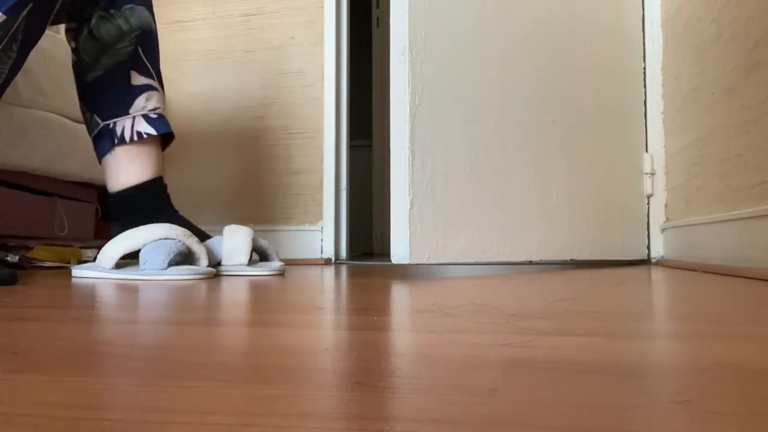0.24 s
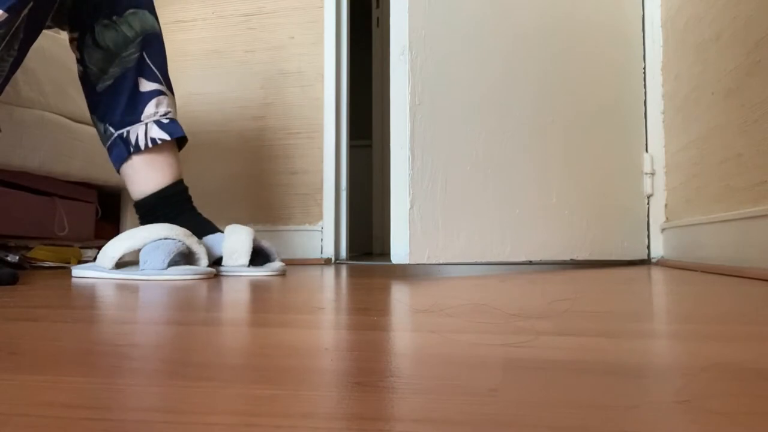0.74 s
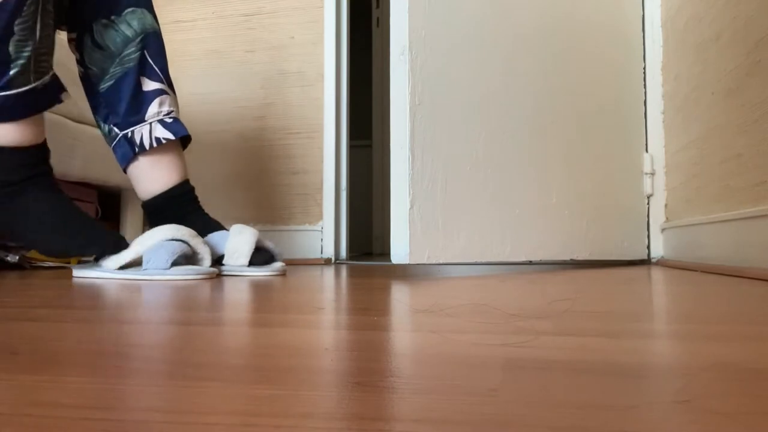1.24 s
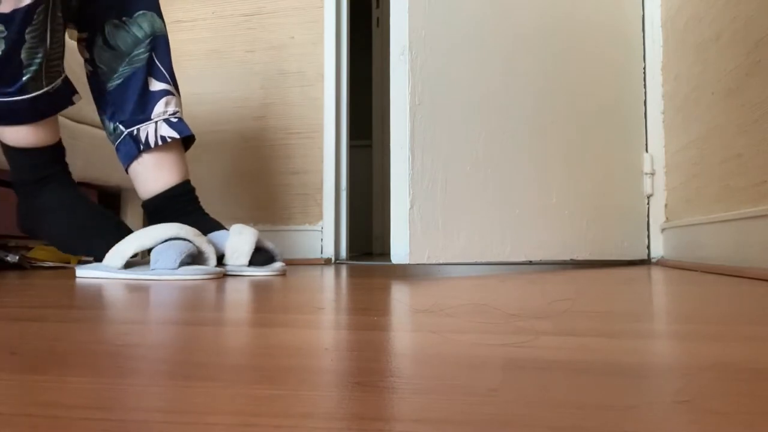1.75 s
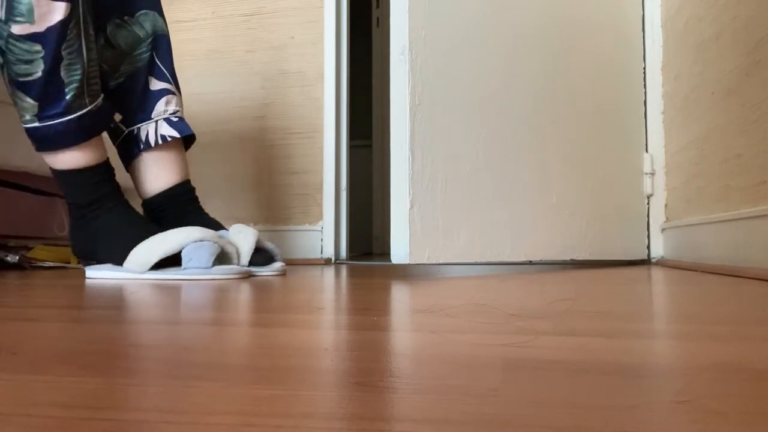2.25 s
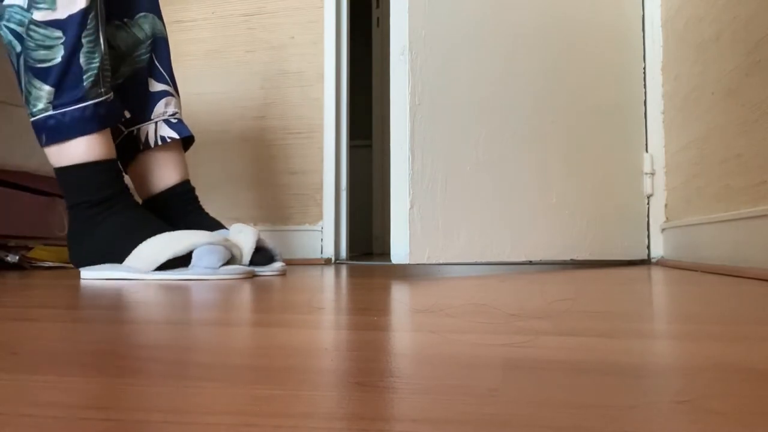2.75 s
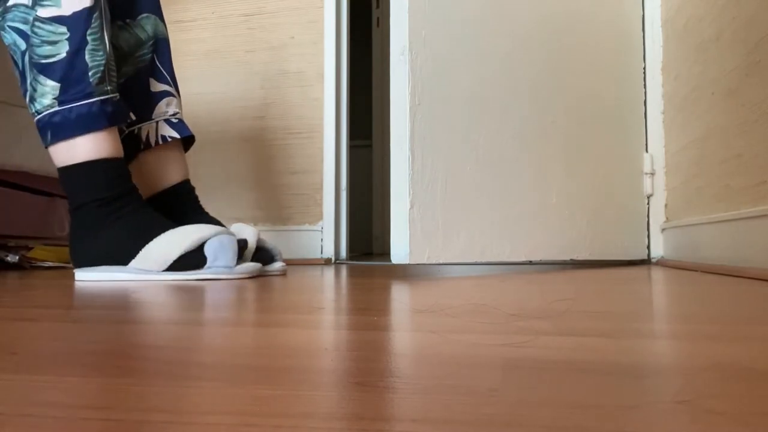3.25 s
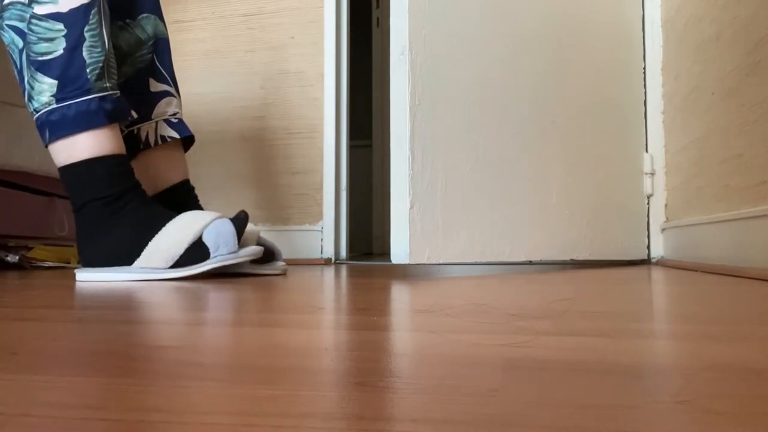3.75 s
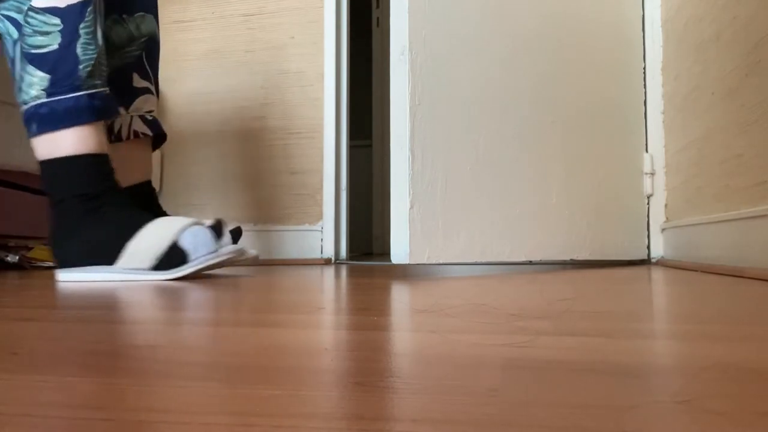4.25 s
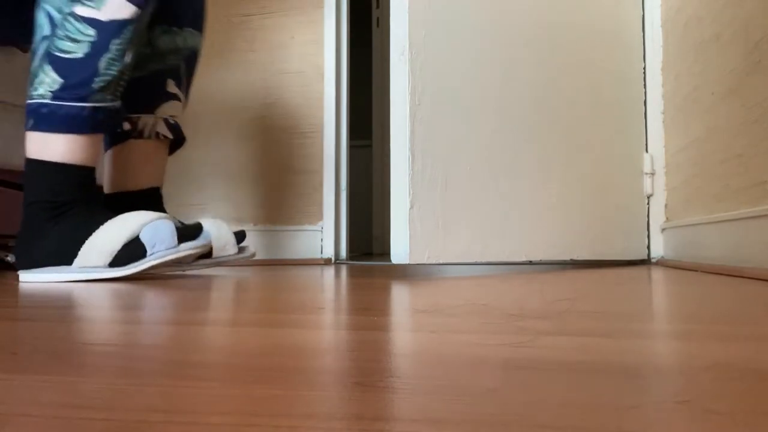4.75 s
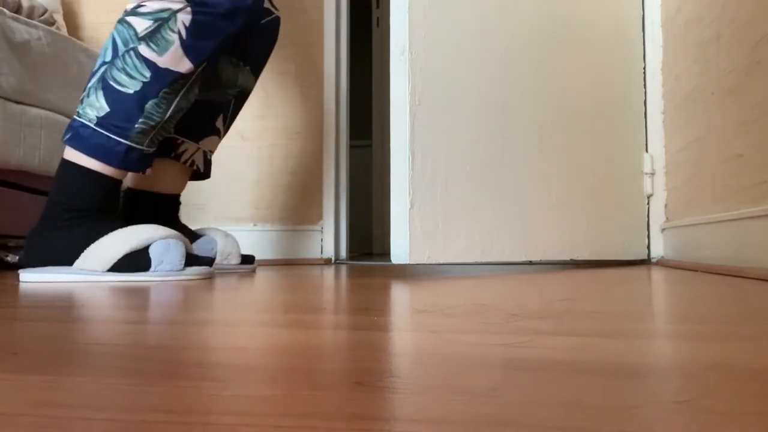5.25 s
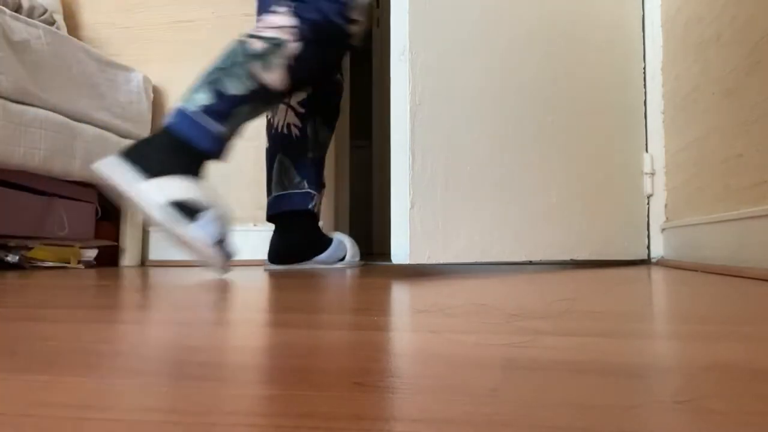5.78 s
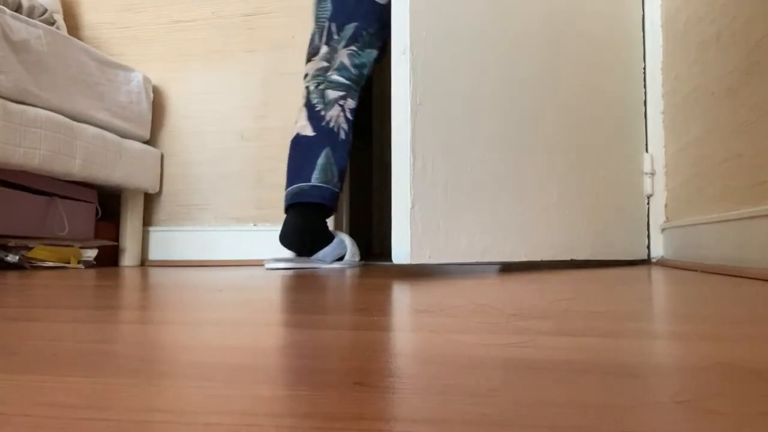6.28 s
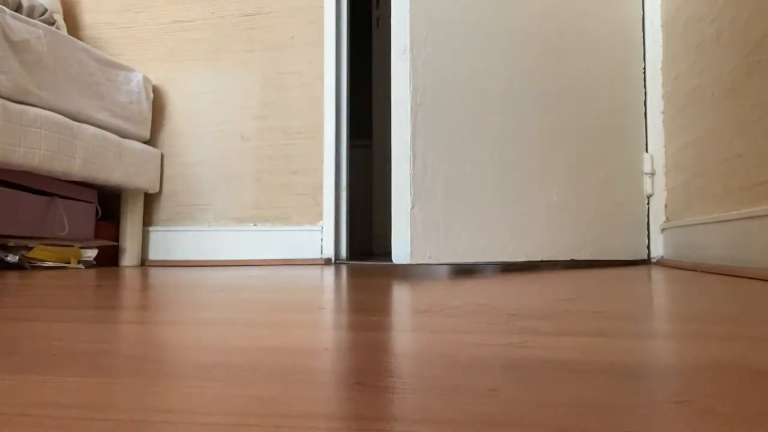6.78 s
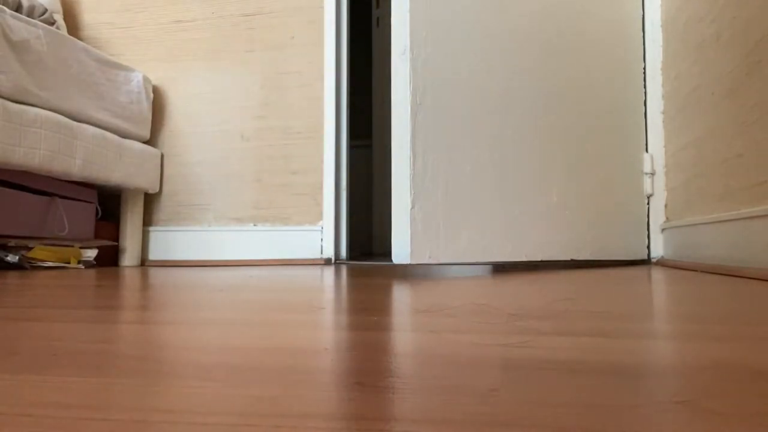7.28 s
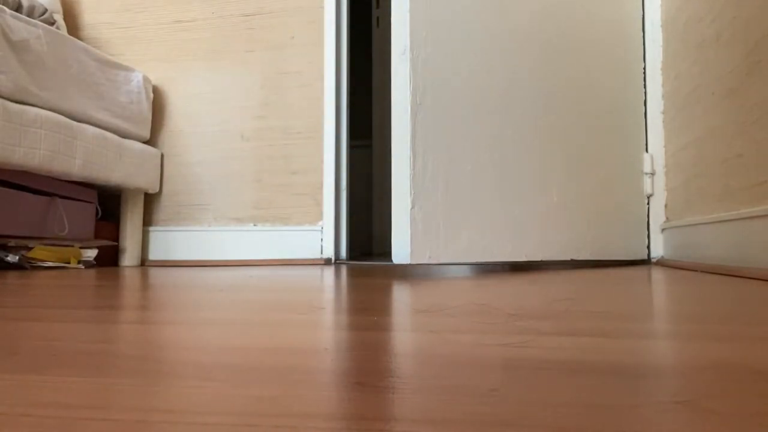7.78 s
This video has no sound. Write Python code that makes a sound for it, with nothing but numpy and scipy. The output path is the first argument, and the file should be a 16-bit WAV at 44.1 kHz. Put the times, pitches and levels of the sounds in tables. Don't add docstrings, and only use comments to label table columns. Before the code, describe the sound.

Stereo floor-level microphones catch fabric brushing and muffled bumps as feet settle into slippers, over still room air and faint low traffic, with one motor briefly humming past early on. Sticky little ticks and a shuffle come midway, then quick scraping steps over wood, a crisp double slap of the sole at the threshold, and a few softer, more echoing scuffs and taps beyond the door.

```python
import sys
import numpy as np
from scipy import signal
from scipy.fft import rfft, irfft, next_fast_len
from scipy.io import wavfile
from scipy.ndimage import uniform_filter1d

SR = 44100
rng = np.random.default_rng(int(sys.argv[2]) if len(sys.argv) > 2 else 0)


def unload_audio(sound):
    columns = np.transpose(np.atleast_2d(sound))
    steps = np.round(np.clip(columns, -1, 1) * 32767)
    wavfile.write(sys.argv[1], SR, steps.astype(np.int16))


def makeup_ratio(level_db):
    decades = np.asarray(level_db, float) / 20
    return 10 ** decades


N = 353814

# frequency in Hz, level in dB per Hz.
AIR_TONE = [(56, -25.5), (95, 0.5), (123, -7), (180, -25), (238, -22.5), (282, -22), (307, -28),
            (633, -65.5), (872, -55), (1010, -42.5), (2280, -52), (9910, -60), (15500, -66)]
# time in seconds, level in dB.
ENGINE_LEVEL = [(0.0, -54.5), (.3, -63), (.65, -73), (.96, -58), (1.3, -61), (1.9, -81.5), (2.03, -50),
                (2.41, -53.5), (2.59, -47.5), (3.04, -51), (3.15, -55.5), (3.48, -46), (3.8, -51.5),
                (4.24, -65.5), (5.02, -57), (5.78, -61.5), (6.1, -53), (8.02, -69.5)]
# time in seconds, level in dB.
TRAFFIC_LEVEL = [(0.0, -56), (.55, -54), (.73, -67.5), (.96, -50), (1.4, -57.5), (1.8, -50.5), (2.1, -61),
                 (2.6, -54), (3.2, -61), (3.8, -55), (4.24, -61.5), (4.5, -53.5), (5.2, -52), (5.8, -58.5),
                 (6.1, -56), (6.79, -49.5), (7.5, -56.5), (8.02, -48)]
# frequency in Hz, width in Hz, level in dB.
ROOM_MODES = [
    [(65.65, 10.6, 2), (77.9, 5.4, -0.5)],
    [(152.06, 5.7, 4), (172.2, 29, 1.5)],
]
# time in seconds, pitch in Hz, level in dB.
MOTOR_BOOM = [
    (0.8, 67.8, -58),
    (0.872, 69, -44.5),
    (0.972, 71.4, -39),
    (1.094, 69.9, -37),
    (1.216, 74.3, -42.5),
    (1.42, 75.3, -45),
    (1.449, 73.6, -43),
    (1.52, 68, -66),
]

# frequency in Hz, level in dB per Hz.
FIBRE_HISS = [(3500, -25), (5100, 3.5), (5900, -1), (7500, -1.5), (9000, 1.5), (11000, -4), (13000, -7),
              (15500, -6)]
# resonance in Hz, width in Hz, level in dB.
PLUSH_RING = [(4100, 890, 1.5), (2850, 1300, 1), (5200, 1400, -16.5)]
SOLE_RING = [(4065, 380, 3), (3200, 1100, -10), (4520, 600, -17), (5770, 1500, -28)]
SLIPPER_BODY = [(1094, 1000, -0.5), (1400, 650, 0), (1923, 1200, -9)]
FLOOR_BOARDS = [(525, 90, 1), (640, 140, -5.5), (850, 94, -11.5), (310, 580, -3)]
HALL_SOLE_RING = [(3230, 600, 5), (3950, 1100, -1), (4640, 740, -2), (5960, 1400, -24)]
HALL_FLOOR_BOARDS = [(480, 140, 2), (640, 280, -3.5), (323, 180, -3), (890, 160, -12.5)]
TAPPED_SOLE = [(3850, 600, 2), (3010, 900, -3), (4600, 790, -15.5), (5740, 1400, -20)]
TREBLE_TICK = [(6430, 2200, 0.5), (7940, 2500, 6.5), (11600, 4900, -16)]

# peak in seconds, rise in seconds, fall in seconds, speed in dB, weight in dB.
SLIP_IN_STROKES = [(0.0, 0.042, 0.04, -61.5, 3.5), (.135, 0.088, 0.24, -79.5, 12.5),
                   (.235, 0.033, 0.075, -58, 3), (0.255, 0.018, 0.084, -65, 19.5),
                   (.47, 0.094, 0.35, -77, 13), (.596, 0.06, 0.07, -67, 8), (.768, 0.046, 0.051, -73, 12.5),
                   (.878, 0.092, 0.12, -67, 6), (1.03, .012, 0.068, -99, 24), (1.073, .1, 0.17, -74, 3.5),
                   (1.278, 0.013, 0.09, -101, 28), (1.363, .09, 0.068, -74.5, 6), (2.0, 0.12, 0.12, -70, 9),
                   (2.249, 0.11, 0.047, -64.5, 5), (2.433, 0.071, 0.19, -66.5, 6.5),
                   (2.652, 0.055, 0.088, -70, 11), (2.859, 0.094, 0.18, -64, -3),
                   (3.003, 0.11, 0.24, -80.5, 18), (3.133, 0.05, 0.38, -68, 5),
                   (3.42, 0.1, 0.091, -68.5, 21), (3.42, 0.13, 0.13, -63, 3),
                   (3.5, 0.082, 0.048, -64.5, -5), (3.6, 0.044, 0.047, -69.5, 8.5),
                   (3.689, 0.093, 0.16, -71.5, 8.5), (3.9, 0.12, 0.17, -74, 8.5),
                   (4.03, 0.074, 0.39, -74.5, 13)]
SHUFFLE_STROKES = [(4.29, 0.079, 0.24, -59.5, 7), (4.37, 0.14, 0.14, -61.5, 6.5),
                   (4.4, 0.23, 0.03, -57, -39), (4.455, 0.14, 0.064, -76, 20.5),
                   (4.57, 0.13, 0.26, -64.5, -1.5), (4.749, 0.11, 0.38, -58, 3.5),
                   (4.88, 0.078, 0.54, -69.5, 7.5), (5.123, 0.24, 0.23, -64.5, -40)]
WALK_STROKES = [(5.323, 0.047, 0.088, -68.5, 11.5), (5.37, 0.02, .15, -73, -21),
                (5.439, 0.076, 0.04, -53, 5.5), (5.473, 0.04, 0.049, -67, 25.5),
                (5.55, 0.086, 0.086, -51.5, 12), (5.667, 0.12, 0.062, -63, 8),
                (5.718, 0.062, 0.038, -74.5, 30), (5.8, 0.11, 0.066, -59, 3.5),
                (5.86, .05, 0.088, -71.5, 8.5), (6.026, 0.11, 0.047, -69, 8.5),
                (6.201, 0.017, 0.18, -70, 19.5), (6.332, 0.014, 0.074, -48, 2), (6.43, 0.47, 0.16, -66, 4),
                (6.435, .015, 0.086, -88, 31), (6.574, 0.073, 0.049, -73.5, 5),
                (6.72, 0.026, 0.061, -91.5, 34.5), (7.075, 0.021, 0.1, -89, 30),
                (7.095, .03, 0.037, -82, 2), (7.13, 0.011, 0.24, -60, 9.5), (7.2, 0.058, 0.26, -68, 0),
                (7.4, 0.21, 0.031, -83.5, -13), (7.835, 0.031, 0.16, -87, 21),
                (7.969, 0.016, 0.063, -60, 9), (7.995, .02, .03, -66, -3)]
# plush ring in dB, slipper body in dB.
STROKE_VOICES = [
    (0.5, -1),
    (-4, -2),
    (2, 0),
]
# peak in seconds, rise in seconds, fall in seconds, level in dB.
DRAGS = [(0.223, 0.03, 0.034, -53.5), (.55, .08, 0.044, -68), (1.358, 0.1, 0.061, -70),
         (1.965, 0.054, 0.079, -65), (2.04, 0.055, 0.022, -59.5), (2.25, 0.12, 0.026, -67),
         (2.45, .05, .1, -78), (2.89, .05, .04, -66.5), (4.08, 0.32, 0.48, -76), (4.9, 0.066, 0.03, -65),
         (4.31, 0.037, 0.086, -61), (4.41, 0.31, 0.053, -56.5), (5.386, 0.014, 0.26, -53),
         (5.452, 0.065, 0.028, -42), (5.53, 0.025, .03, -42), (5.553, 0.039, 0.05, -40),
         (5.585, 0.038, 0.025, -46.5), (6.6, 0.1, 0.023, -64), (6.54, 0.24, 0.018, -62.5),
         (7.13, 0.012, 0.12, -53), (7.182, 0.0091, .04, -45), (7.39, 0.11, 0.051, -66.5),
         (9.2, 0.027, .08, -73)]
# peak in seconds, rise in seconds, fall in seconds, level in dB.
BODY_FLEXES = [(.135, 0.056, 0.07, -65), (.26, .02, 0.06, -68), (.46, 0.046, .14, -68.5),
               (2.997, 0.0095, 0.026, -64.5), (4.752, .015, 0.12, -52), (5.43, 0.018, 0.024, -34),
               (5.452, 0.022, 0.025, -39), (5.55, 0.089, 0.13, -49.5), (6.203, 0.014, 0.12, -53),
               (6.34, 0.017, 0.12, -53), (6.709, 0.0085, 0.027, -73), (7.14, .015, 0.11, -72),
               (7.185, 0.02, 0.052, -61), (7.39, 0.11, 0.079, -71), (7.815, 0.024, 0.18, -70)]

# start in seconds, board pitch in Hz, level in dB, hardness in dB.
TOES = [(0.0612, 400, -66, -4), (0.247, 540, -33, -30), (0.2747, 560, -44, -24), (0.3852, 544, -48, -17),
        (.412, 540, -55, -18), (.508, 624, -58, -12), (.588, 510, -50.5, -20), (.5504, 654, -47, -21),
        (1.0166, 443, -51.5, -19), (1.266, 454, -53, -16), (2.4224, 653, -54.5, -7),
        (2.6054, 604, -51.5, -20), (2.948, 620, -63, -10), (2.9913, 510, -47.5, -11),
        (3.134, 517, -50.5, -21), (3.2865, 705, -58.5, -9), (3.3325, 593, -52.5, -8),
        (3.3413, 556, -50.5, -7.5), (3.428, 800, -64, -5), (3.512, 750, -66, -7), (3.526, 800, -66, -8),
        (3.4734, 745, -51.5, -11), (3.5809, 620, -51.5, -9), (4.0062, 610, -51.5, -15),
        (4.4387, 473, -58, 8), (4.7375, 820, -52.5, 16.5)]
# start in seconds, board pitch in Hz, level in dB, hardness in dB.
STEPS = [(5.316, 944, -46, -5.5), (5.7062, 684, -43, -17), (5.6515, 640, -45.5, -8), (5.452, 464, -42, -3),
         (5.841, 616, -52.5, -17), (5.6923, 650, -41.5, -3), (5.8174, 630, -51, 3.5),
         (6.1935, 835, -50.5, 1), (6.239, 830, -49, -8), (6.423, 463, -65.5, -3), (6.7054, 780, -51.5, -27),
         (7.0648, 450, -48, -27), (7.1305, 545, -50, -4), (7.178, 506, -55, 12), (7.8116, 454, -55, -11.5),
         (7.9348, 530, -43, -14), (7.9572, 556, -47.5, 0.5)]
# start in seconds, board pitch in Hz, level in dB, hardness in dB.
SOLE_SLAPS = [
    (6.3088, 850, -43.5, 3.5),
    (6.312, 890, -34.5, 0.5),
    (6.319, 966, -40.5, -5),
    (6.3228, 890, -42, 8),
    (6.3257, 873, -36.5, -2),
    (6.3353, 640, -55.5, 12),
]
# start in seconds, board pitch in Hz, level in dB, hardness in dB.
PEEL_CRACKLE = [
    (3.3643, 493, -44, -2),
    (3.3827, 600, -50, 5),
    (3.394, 900, -59, -4),
    (3.4027, 610, -44.5, 3),
    (3.4169, 694, -52.5, 4),
    (3.44, 746, -60, -8),
]
# start in seconds, board pitch in Hz, level in dB, hardness in dB.
BOUNCES = [(.262, 596, -48, -21), (.293, 600, -51.5, -25), (.313, 560, -51.5, -25), (3.61, 534, -57, -17),
           (4.742, 1155, -45, -19), (4.75, 510, -50, -20), (4.773, 1320, -45, -16), (4.888, 575, -54, -2),
           (4.909, 536, -49.5, -5), (5.426, 980, -40, -5), (5.488, 570, -45, -18.5),
           (5.523, 756, -42.5, -4), (5.577, 700, -42, -13), (5.721, 704, -51, -10), (6.2, 773, -48, -7),
           (6.251, 860, -50, -11), (6.355, 798, -52, -4.5), (6.44, 456, -54, -20), (7.076, 480, -51, -26),
           (7.824, 440, -52, -24), (7.84, 480, -55, -16), (7.865, 447, -66, -18), (7.971, 580, -44, -21),
           (7.986, 480, -48, -20)]
# sole in dB, tick in dB, contact in seconds.
KNOCK_VOICES = [
    (-2.5, -4.5, 0.0032),
    (1.5, -24, 0.00442),
    (10.5, -6.5, 0.00093),
    (-5.5, -12, 0.0011),
    (-2, -17, .0028),
]
# start in seconds, tick level in dB, share of sole in dB.
FIBRE_SNAPS = [(0.2465, -63, 20), (.5853, -42, -14), (0.7657, -65.5, 4.5), (2.9, -52, -10), (3.13, -64, 6),
               (3.183, -45.5, -53), (3.819, -52, -5.5), (3.8811, -59, .1), (4.2, -52, -30), (4.437, -62, 8),
               (4.564, -60, 2), (5.684, -44, -24), (5.801, -39, -8.5), (5.815, -38, -7.5), (6.2, -56, -2),
               (6.3078, -30, -22), (6.3215, -29, -19), (7.196, -36, -30), (7.9577, -44, -25)]
# start in seconds, pitch in Hz, level in dB.
JOIST_THUMPS = [
    (.25, 177, -51),
    (3.371, 301.6, -61),
    (3.389, 192.4, -56),
    (4.745, 343, -60),
    (4.893, 113, -48.5),
    (5.458, 219, -63),
    (6.194, 302.4, -59.5),
    (6.425, 440, -59.5),
]

# time in seconds, room echo share in dB.
WALKER_PLACE = [
    (0, -8.5),
    (5.6, -9.5),
    (6.1, -10.5),
    (6.33, -9),
    (6.6, -7.5),
    (8.02, -3),
]
# frequency in Hz, left minus right in dB.
LEFT_OVER_RIGHT = [(60, -5), (110, -0.5), (200, -10.5), (380, -6.5), (700, -6), (1290, -4.5), (2380, -1),
                   (4400, -3.5), (8120, -1.5), (15000, 0.5)]
# frequency in Hz, lag in cycles.
RIGHT_LAG = [(0, 0), (1800, .5), (3400, 1.05), (5200, 1.5), (7800, 2), (10350, 2.5), (13000, 3),
             (15550, 3.5)]
# frequency in Hz, share of the left port's sound in the right.
PORT_SHARE = [(3500, 0.0082), (6000, 0.21), (7200, 0.97), (9000, 0.69), (10000, 0.93)]

DOOR_S = 6.9
SHARED = 0.47


def unit(x):
    return x / np.sqrt(np.mean(x ** 2))


def noise():
    return rng.standard_normal(N)


def colour(x, table):
    size = next_fast_len(N, True)
    hz = np.arange(size // 2 + 1) * SR / size + 0.0012
    points = np.array(table)
    db = np.interp(np.log(hz), np.log(points[:, 0]), points[:, 1])
    return irfft(rfft(x, size) * makeup_ratio(db), size)[..., :N]


def ring(x, modes):
    return sum(makeup_ratio(db) * signal.lfilter(*signal.iirpeak(hz, hz / width, SR), x) for hz, width, db in modes)


def steep(x, modes):
    low_hz = min(m[0] for m in modes) / 1.3
    high_hz = max(m[0] for m in modes) * 1.3
    band = signal.butter(2, (low_hz, high_hz), "bandpass", fs=SR, output="sos")
    return signal.sosfilt(band, ring(x, modes))


def walk(rate):
    hold = int(SR / rate)
    levels = np.repeat(rng.standard_normal(N // hold + 1), hold)
    return unit(uniform_filter1d(levels, hold)[:N])


def curves(table):
    s, *columns = np.transpose(table)
    return [np.interp(np.arange(N) / SR, s, c) for c in columns]


def pair(chance, shared=SHARED):
    return shared * chance[0] + np.sqrt(1 - shared ** 2) * chance[1:]


def air():
    shared = colour(noise(), [(150, -8.0), (400, -19.5)])
    own = [colour(noise(), [(100, -8), (350, 5.5)]) for _ in range(2)]
    tone = np.array([colour(shared + x, AIR_TONE) for x in own])
    return unit(tone * makeup_ratio(0.4 * walk(3.3))) * makeup_ratio(-62.5)


def steady(x):
    return x / np.sqrt(uniform_filter1d(x ** 2, size=SR // 2))


def rumble():
    t = np.arange(N) / SR
    (engine_db,), (street_db,) = curves(ENGINE_LEVEL), curves(TRAFFIC_LEVEL)
    upper_db = -63.5 + 0.55 * (street_db - street_db.mean()) + 0.15 * (engine_db - engine_db.mean())
    modes = 0
    for db, group in zip((street_db, upper_db), ROOM_MODES):
        modes = modes + makeup_ratio(db) * steady(ring(ring(noise(), group), group))
    first_hz = 46.0 + 1.495 * walk(4.5)
    first = makeup_ratio(engine_db) * np.sqrt(2) * np.sin(2 * np.pi * np.cumsum(first_hz) / SR)
    deepest = [(37, 7, 0)]
    sub = makeup_ratio(-68) * unit(ring(ring(noise(), deepest), deepest))
    motor_hz, motor_db = curves(MOTOR_BOOM)
    on = np.clip(np.minimum(t - MOTOR_BOOM[0][0], MOTOR_BOOM[-1][0] - t) / .04, 0, 1)
    motor = on * makeup_ratio(motor_db) * np.sqrt(2) * np.sin(2 * np.pi * np.cumsum(motor_hz) / SR)
    return first + sub + (1 - 0.37 * on) * modes + motor


def grit(per_s, scatter_db, flicker_db, shared=SHARED):
    catches = (rng.random(N) < per_s / SR) * makeup_ratio(scatter_db * rng.random(N))
    bed = pair(rng.standard_normal((3, N)), shared)
    return bed * (1 + 0.43 * unit(catches)) * makeup_ratio(flicker_db * walk(39))


def swell(t, s, rise, fall, db):
    away = np.where(t < s, (s - t) / rise, (t - s) / fall)
    return makeup_ratio(2 * (db - 20 * away ** 1.32))


def strokes():
    t = np.arange(0, N / SR, .001)
    power = np.zeros((5, len(t)))
    power[3] += makeup_ratio(2 * -74.5)
    for table, (plush_db, body_db) in zip((SLIP_IN_STROKES, SHUFFLE_STROKES, WALK_STROKES), STROKE_VOICES):
        for *stroke, weight_db in table:
            voice_db = np.array([0, plush_db + 0.05 * weight_db, body_db + 0.04 * weight_db, weight_db])
            power[:4] += swell(t, *stroke) * makeup_ratio(2 * voice_db[:, None])
    power[2] += sum(swell(t, *flex) for flex in BODY_FLEXES)
    power[4] += sum(swell(t, *drag) for drag in DRAGS)
    return [np.interp(np.arange(N) / SR, t, np.sqrt(p)) for p in power]


def wander(x):
    place = np.cumsum(1 + .05 * walk(9)) % (N - 1)
    return np.array([np.interp(place, np.arange(N), c) for c in x])


def contacts():
    rows = []
    kinds = (TOES, STEPS, SOLE_SLAPS, PEEL_CRACKLE, BOUNCES)
    for table, (sole_db, tick_db, contact) in zip(kinds, KNOCK_VOICES):
        for s, hz, db, hard_db in table:
            body_db = db + hard_db
            rows.append((s, contact, body_db + tick_db, hz, db, body_db, body_db + sole_db))
    for s, db, share_db in FIBRE_SNAPS:
        rows.append((s, 0.0035, db, 585, db + share_db / 2 - 8.5, db + share_db - 7.5, db + share_db))
    return rows


def scuffs():
    hiss, plush, body, board, sole = strokes()
    inside = np.arange(N) < DOOR_S * SR

    def heard(x, near, far):
        return np.where(inside, wander(unit(steep(x, near))), unit(steep(x, far)))

    fine = grit(1500, 6.0, 2.2, 0.84)
    parts = hiss * unit(colour(fine, FIBRE_HISS))
    parts += plush * heard(fine, PLUSH_RING, HALL_SOLE_RING)
    parts += sole * heard(fine[::-1, ::-1], SOLE_RING, HALL_SOLE_RING)
    parts += body * unit(steep(grit(700, 9.0, 2.56), SLIPPER_BODY))
    parts += board * heard(grit(250, 5.0, 2.5), FLOOR_BOARDS, HALL_FLOOR_BOARDS)
    lift = np.zeros(N)
    for s, *_ in contacts():
        lift[int((s - .012) * SR):int((s + .005) * SR)] = 1
    return parts * makeup_ratio(-2.5 * uniform_filter1d(lift, size=180))


def taps():
    out = np.zeros((2, N + SR))
    t = np.arange(2048) / SR
    for s, contact, tick_db, hz, board_db, body_db, sole_db in contacts():
        chance = rng.standard_normal((3, len(t)))
        crack = pair(chance) * (1 - np.exp(-1.6 * t / contact)) * np.exp(-t / contact)
        push = np.exp(-((t - contact / 2) / (contact / 9)) ** 2) + 40 * contact * crack
        board = [(hz, 150, 0), (1.45 * hz, 200, -11)]
        sole = TAPPED_SOLE if s < DOOR_S else HALL_SOLE_RING
        layers = [(steep(push, board), board_db + 7, .0006),  # sound, peak dB, delay s
                  (steep(crack, SLIPPER_BODY), body_db + 8, .0002),
                  (steep(crack, sole), sole_db + 7, 0),
                  (steep(crack, TREBLE_TICK), tick_db - 3, 0)]
        for x, db, late in layers:
            i = int((s + late) * SR)
            out[:, i:i + len(t)] += makeup_ratio(db) * x / np.abs(x).max()
    return out[:, :N]


def room(x):
    t = np.arange(SR // 2) / SR
    high_t60_s, low_t60_s, low_db = 0.11, 0.2, -6
    high, low = rng.standard_normal((2, 2, len(t))) * (1 - np.exp(-t / .005))
    low = unit(signal.lfilter(*signal.butter(2, 1100, fs=SR), low)) * makeup_ratio(low_db - 60 * t / low_t60_s) / 4
    high = signal.lfilter(*signal.butter(1, 7000, fs=SR), high) * makeup_ratio(-60 * t / high_t60_s)
    tail = (high + low) / np.sqrt(np.sum(high ** 2) / 2)
    return signal.fftconvolve(x[None], tail, axes=1)[:, :N]


def thumps():
    t = np.arange(N) / SR
    out = np.zeros(N)
    for s, hz, db in JOIST_THUMPS:
        since = np.clip(t - s, 0, None)
        swelling = (1 - np.exp(-since / 0.01)) * np.exp(-since / 0.042)
        out += makeup_ratio(db) * 2 * swelling * np.sin(2 * np.pi * hz * since)
    return out


def ports(left, right):
    size = next_fast_len(N, True)
    hz = np.arange(size // 2 + 1) * SR / size
    share = np.interp(hz, *np.transpose(PORT_SHARE))
    late = np.exp(-2j * np.pi * np.interp(hz, *np.transpose(RIGHT_LAG)))
    mixed = share * rfft(left, size) + (1 - share) * rfft(right, size)
    return left, irfft(mixed * late, size)[:N]


def scene():
    rub, tap = scuffs(), taps()
    (room_db,) = curves(WALKER_PLACE)
    echo = room(makeup_ratio(room_db) * (rub[0] + makeup_ratio(-1.5) * tap[0]))
    return rub + tap + echo + thumps() + rumble() + air()


def band_limit(x):
    return signal.sosfilt(signal.butter(12, 15690, fs=SR, output="sos"), x)


def record(dry):
    sides = []
    for c, side in zip(ports(*dry), (1, -1)):
        sides.append(colour(c, [(hz, side * db / 2) for hz, db in LEFT_OVER_RIGHT]))
    x = signal.sosfilt(signal.ellip(6, .5, 50, 15650, fs=SR, output="sos"), np.array(sides))
    x = x * np.clip((8.006 - np.arange(N) / SR) / .006, .03, 1)
    return band_limit(x)


dry = scene()
out = record(dry)
unload_audio(out)
```